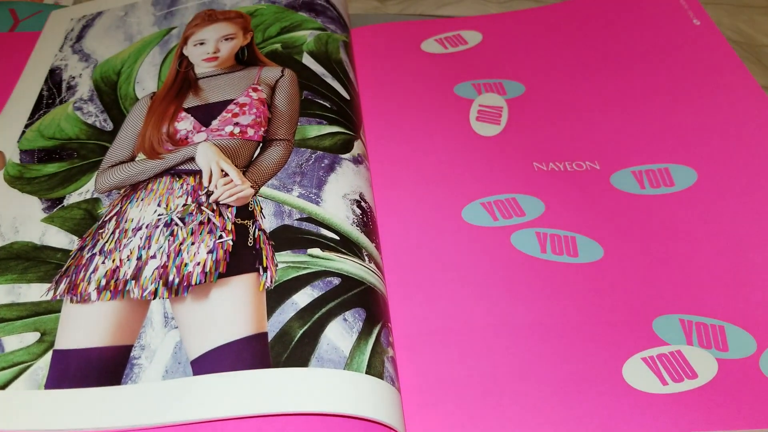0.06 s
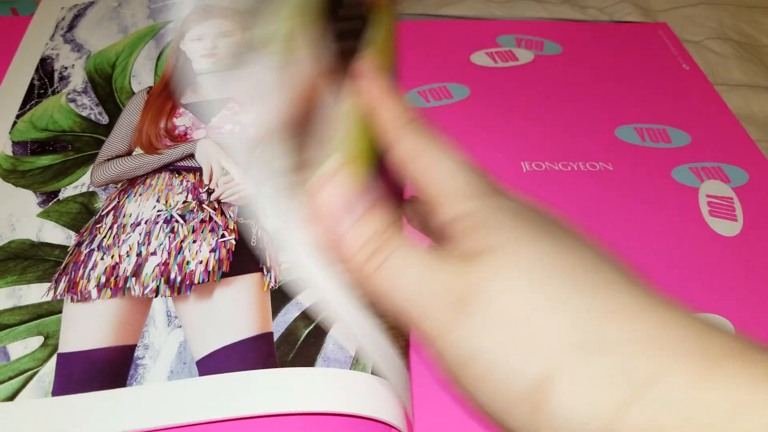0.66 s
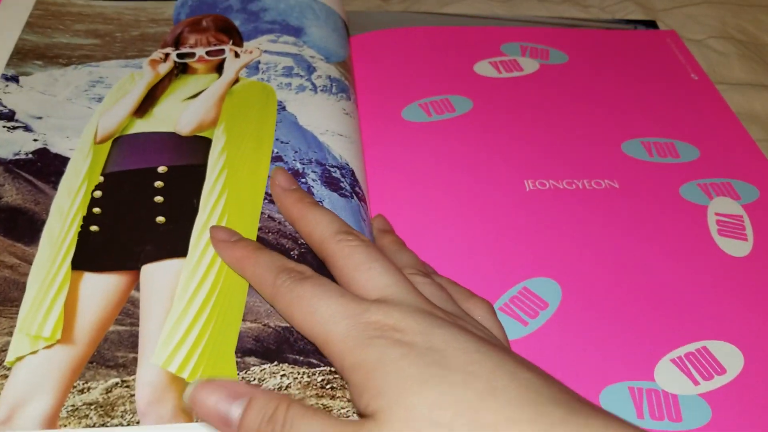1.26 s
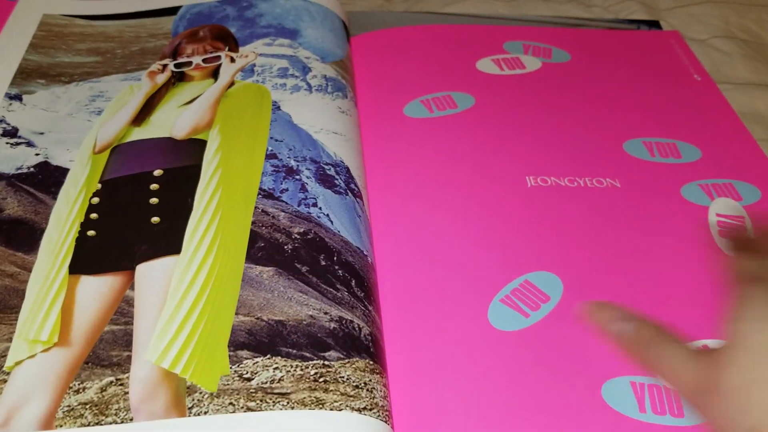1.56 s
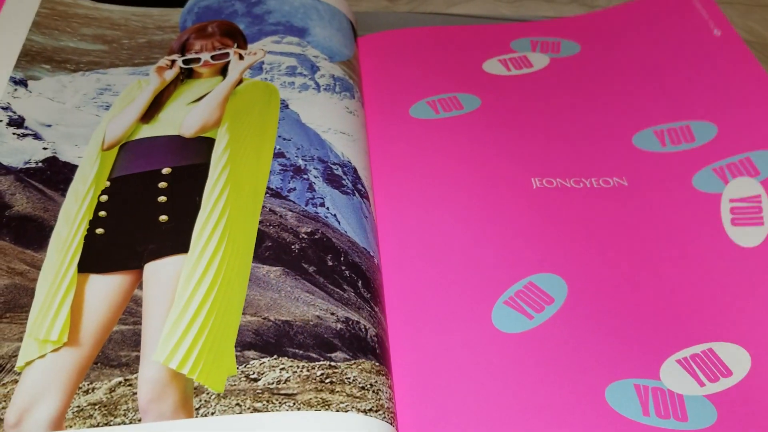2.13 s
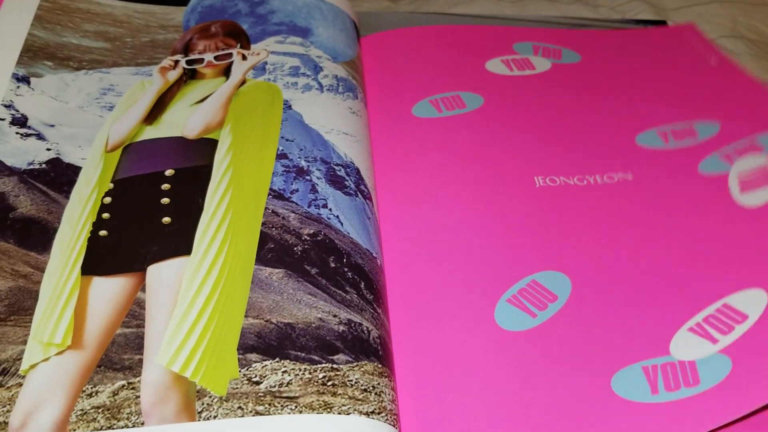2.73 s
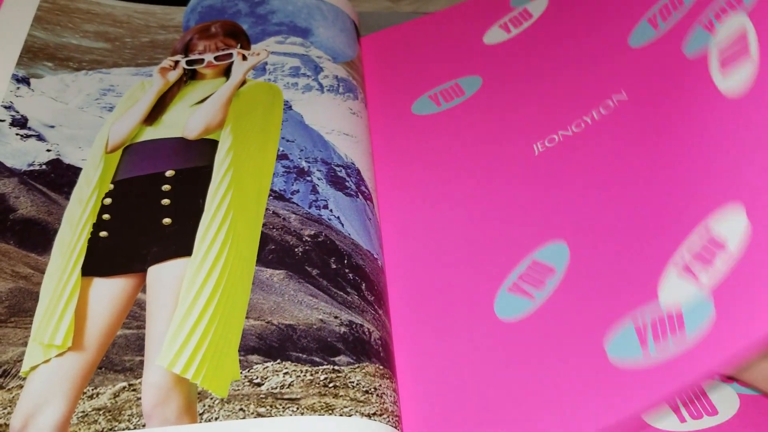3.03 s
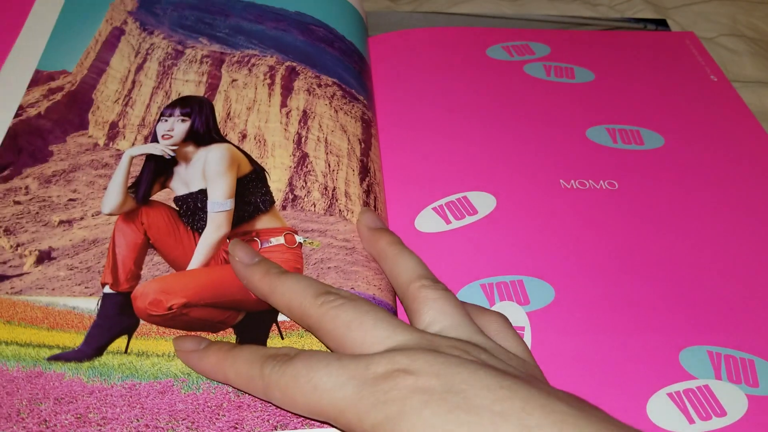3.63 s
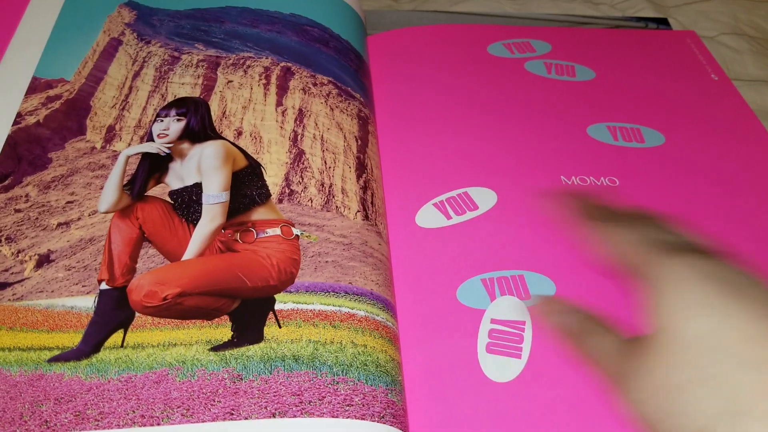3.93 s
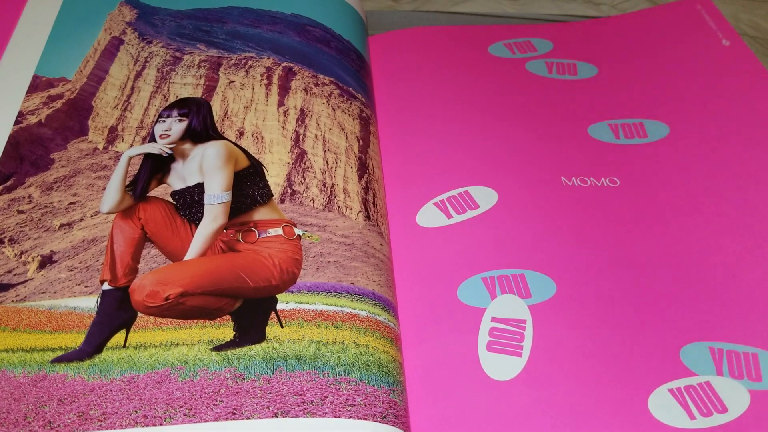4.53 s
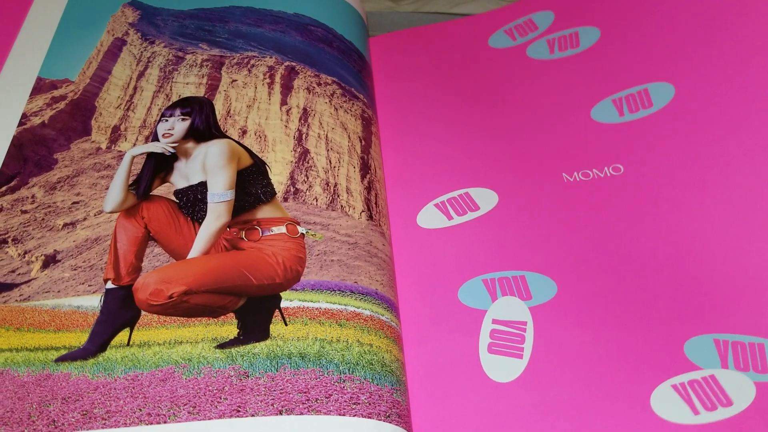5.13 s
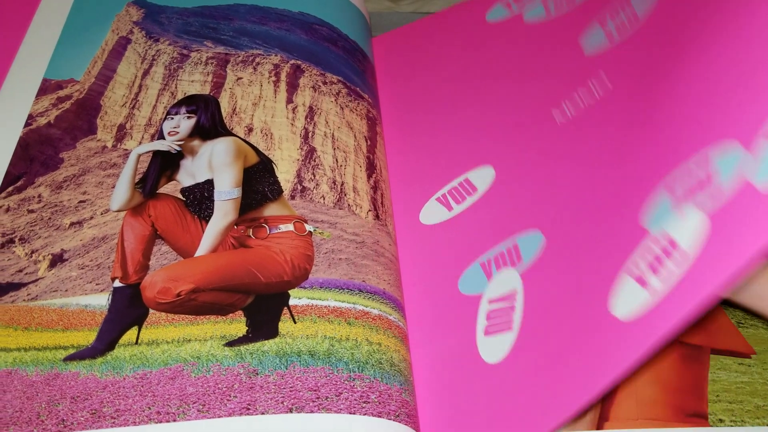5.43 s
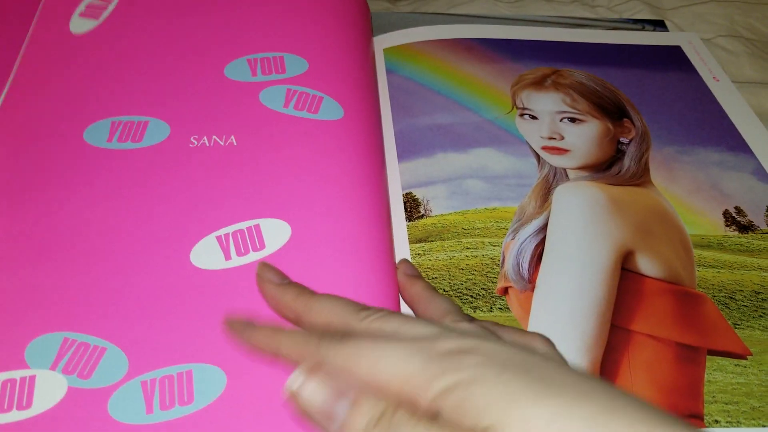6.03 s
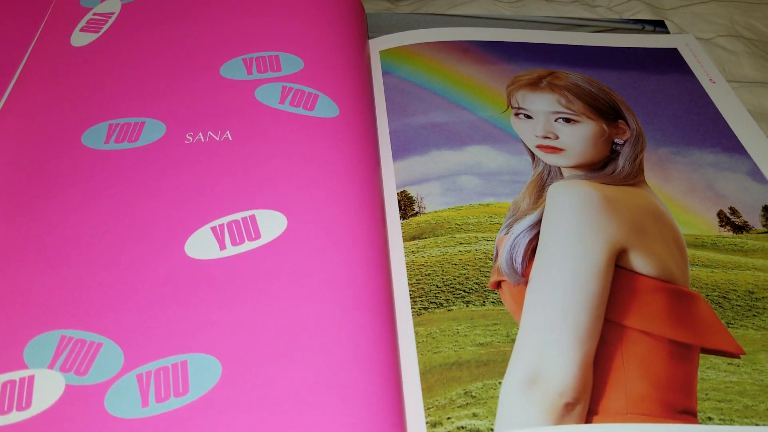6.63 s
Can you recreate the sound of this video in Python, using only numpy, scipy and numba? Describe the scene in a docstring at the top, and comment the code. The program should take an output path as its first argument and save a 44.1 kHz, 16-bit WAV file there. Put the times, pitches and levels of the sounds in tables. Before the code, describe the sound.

Stiff paper crackles and scrapes under fingertips, then a big glossy sheet swishes over and lands with a hollow flap. This happens three times, with light thumps from the book, palm pats and hissing strokes across the page in between. The sound is close and dry, leaning left and moving further left with each turn, over the faint background hiss of a small furnished room.

```python
"""Paper crackles and rubs as fingers pick at a page edge: three large glossy pages of a photo book are
turned by hand, close by, in a small quiet room. Each sheet buckles with a hollow flap, hisses over its
neighbour and sweeps down on the left; the hand pats it flat and strokes away across the paper.
Friction is grainy noise, coloured by the air under the sheet; blows ring the sheet and the book."""
import sys
import numpy as np
from scipy import signal
from scipy.fft import rfft, irfft
from scipy.io import wavfile
from scipy.ndimage import uniform_filter1d, map_coordinates
from numba import njit

SR = 44100
rng = np.random.default_rng(int(sys.argv[2]) if len(sys.argv) > 2 else 0)


def waveform_to_disk(signal):
    """Save audio, clipped to [-1, 1], as 16-bit WAV at the path in sys.argv[1]."""
    frames = np.transpose(np.atleast_2d(signal))
    scaled = np.clip(frames, -1, 1) * 32767
    samples = np.round(scaled).astype(np.int16)
    wavfile.write(sys.argv[1], SR, samples)


N = 299439
T = np.arange(N) / SR

# Spectral shapes. Each row: frequency in Hz, relative density in dB.
ROOM_SPECTRUM = [(25, -14), (100, -3.5), (200, -17), (500, -26.5), (1300, -27.5), (15000, -33.5)]
HISS_SPECTRUM = [(200, -29.5), (1000, -24), (2500, -15), (4500, -4.5), (7000, -4), (10000, 1), (13000, 4.5),
                 (17000, -1)]
RUB_SPECTRUM = [(22, -25), (100, 9.5), (300, 1.5), (550, -16.5), (850, 0.5), (1500, -1.5), (3000, 4.5),
                (4600, -4), (7000, -7), (15000, -24.5)]
CREASE_SPECTRUM = [(22, -16), (120, -0.5), (330, -1), (550, -9.5), (850, -1.5), (1500, -2), (2600, -4.5),
                   (8000, -32.5)]
SNAP_SPECTRUM = [(1000, -67), (2800, -12), (4400, 11.5), (6500, 7), (16000, 2.5)]
# Book on the bedding. Each row: resonance in Hz, width in Hz, gain in dB.
BOOK_MODES = [(112, 30, -2.5), (155.7, 28, 4.5), (238, 54, -0.5)]
# Page stack under a fingertip. Each row: resonance in Hz, width in Hz, gain in dB.
STACK_MODES = [(318, 350, 4.5), (788, 145, 2.5), (1270, 1600, -8.5)]
# Bent sheet. Each row: multiple of the flap pitch, relative width, gain in dB.
SHEET_MODES = [(0.85, 0.6, -8.5), (1.1, 0.46, 2), (1.52, 0.15, -12)]
# Air in the curl of a lifted sheet. Each entry: resonance in Hz before drift.
CURL_MODES_HZ = [1284, 1760, 2032, 2518, 2667, 4330, 5710]

# Event levels below are at the source, before filtering and balance.
# Soft blows on the block of pages. Each row: start in seconds, level in dB.
BOOK_THUMPS = [(0.019, -45.5), (0.116, -48), (0.561, -44), (1.211, -55.5), (1.306, -53.5), (2.966, -46),
               (3.023, -45), (3.173, -42.5), (4.705, -51), (4.752, -51.5), (4.978, -49), (6.653, -54.5)]
# Palm pats the page flat. Each row: start in seconds, tick level in dB, thud level in dB.
PALM_PATS = [(3.4253, -39.5, -48), (3.704, -44.5, -42), (5.7623, -37, -55), (6.006, -45, -45.5)]
# Fingertip drags. Each row: peak time in seconds, level in dB, half-width in seconds.
FINGER_SCUFFS = [(1.036, -59, .01), (1.3, -73, 0.059), (2.223, -55.5, 0.027), (3.725, -59, 0.015),
                 (4.335, -61, 0.013), (4.422, -59.5, 0.01), (4.73, -55, 0.032), (6.09, -63, 0.039)]
# Hand or loose sheet brushes the page. Each row: peak time in seconds, level in dB, rise and fall
# in seconds.
BRUSH_STROKES = [(0.57, -51.5, 0.0065, 0.041), (0.719, -58.5, 0.044, 0.034), (1.43, -58, 0.023, 0.014),
                 (1.557, -48, 0.043, 0.045), (1.86, -64.5, 0.27, 0.042), (2.09, -68, 0.01, 0.04),
                 (3.865, -52, 0.037, 0.036), (3.992, -43, 0.023, 0.033), (4.201, -63.5, 0.11, 0.12),
                 (6.134, -56.5, 0.054, 0.0055), (6.245, -43.5, 0.038, 0.034), (6.48, -60, 0.039, 0.021)]
# Edge or palm sweeps the page. Each row: peak time in seconds, level in dB, pitch at the peak in Hz,
# swell and t60 in seconds.
EDGE_SCRAPES = [(0.324, -42, 2770, 0.048, 0.22), (0.979, -47, 2420, 0.054, 0.13),
                (2.57, -47, 3200, 0.053, 0.13), (2.718, -47, 2070, 0.053, 0.44),
                (2.971, -36.5, 4070, 0.0032, .02), (3.557, -43.5, 2220, 0.045, 0.062),
                (3.981, -55, 4660, 0.033, 0.3), (4.401, -58.5, 7250, 0.009, 0.18),
                (4.814, -34.5, 4000, 0.015, 0.056), (4.853, -37, 2200, 0.034, 0.049),
                (5.06, -43, 1480, 0.061, 0.38), (5.143, -48, 1400, 0.034, 0.055),
                (5.659, -51, 1120, 0.088, 0.6), (5.858, -43, 2130, 0.039, 0.061),
                (6.261, -60, 970, 0.098, 0.27), (5.29, -53.5, 1450, 0.022, 0.68)]
# Fingers tug the sheet or feel along its edge. Each row: start and hold in seconds, level in dB.
FINGER_PULLS = [(0.096, 0.016, -53), (0.206, 0.04, -54), (0.288, 0.17, -74), (1.04, 0.19, -71),
                (2.348, 0.21, -49.5), (3.0, 0.051, -59), (4.465, 0.028, -65), (4.578, 0.21, -67.5),
                (4.814, 0.024, -47.5), (4.913, 0.095, -52.5), (5.062, 0.08, -54.5), (5.275, 0.0099, -51)]
# Edges slip off fingers, creases snap. Each row: start in seconds, body and snap in dB, t60 in seconds.
EDGE_CRACKLES = [(0.001, -44, -47, 0.074), (0.083, -41.5, -41, 0.051), (0.1143, -37, -39.5, 0.035),
                 (0.1735, -40.5, -43.5, 0.033), (0.199, -38, -42, 0.015), (0.383, -45, -55, 0.029),
                 (0.795, -47.5, -50, 0.08), (1.125, -66, -49.5, 0.029), (2.326, -43.5, -36, 0.11),
                 (2.356, -38, -50, 0.073), (2.379, -39.5, -44, 0.043), (2.412, -35, -40.5, 0.074),
                 (2.437, -35, -45, 0.042), (2.467, -34.5, -45.5, 0.062), (2.490, -37.5, -45, 0.12),
                 (2.5279, -40, -47, 0.02), (2.951, -46, -51.5, 0.05), (2.9659, -36.5, -48, 0.047),
                 (3.173, -47, -48, 0.024), (4.42, -55, -54.5, 0.067), (4.702, -55, -53, 0.11),
                 (4.7909, -40.5, -43.5, 0.013), (4.893, -41, -48.5, 0.091), (4.923, -35, -44, 0.082),
                 (4.947, -38, -51, 0.054), (4.971, -38, -49, 0.037), (5.007, -34.5, -43.5, 0.064),
                 (5.031, -35.5, -43.5, 0.043), (5.12, -47.5, -47.5, 0.14), (5.232, -40.5, -47.5, 0.067),
                 (5.277, -45.5, -48, 0.075), (6.655, -58, -58.5, 0.087), (6.7671, -53.5, -51, 0.026)]
# Sheet buckles or lands on its air cushion. Each row: start in seconds, level in dB, pitch in Hz,
# swell and t60 in seconds.
SHEET_FLAPS = [(0.847, -44, 870, 0.004, 0.063), (0.9889, -35.5, 764, 0.00038, 0.032),
               (2.288, -53.5, 1110, 0.004, 0.14), (2.975, -30.5, 1070, 0.0024, 0.021),
               (2.979, -27, 870, 0.0079, 0.03), (2.9945, -49, 1060, 0.00041, 0.021),
               (3.008, -42.5, 1230, 0.0069, 0.055), (3.176, -54, 680, 0.0044, 0.074),
               (3.426, -35, 1310, 0.0078, 0.12), (5.763, -39, 1100, 0.003, 0.095),
               (5.7937, -39, 1240, 0.0018, 0.033)]
# Sheet is carried over. Each row: lift and landing in seconds, lead of the fastest swing on the landing
# in seconds, carry rub, carry hiss and swing hiss in dB.
PAGE_TURNS = [(0.2, 0.979, 0.47, -62.5, -60, -60.5), (2.6, 3.557, 0.24, -67.5, -64.5, -50),
              (5.24, 5.855, 0.22, -69.5, -64.5, -51.5)]
# Hand crosses the spine. Each row: leftward time and return time in seconds.
SPINE_CROSSINGS = [(0.58, 1.45), (3.14, 3.85), (5.55, 6.2)]


def undb(db):
    """Decibels to gain."""
    return 10 ** (np.asarray(db) / 20)


def unit(x):
    """Scale to rms 1."""
    return x / np.sqrt(np.mean(x ** 2))


def colour(x, spectrum):
    """Minimum-phase filter of unit power through (Hz, dB) points."""
    hz, db = np.transpose(spectrum)
    grid_hz = np.maximum(np.fft.rfftfreq(4096, 1 / SR), 1)
    cepstrum = irfft(np.log(undb(np.interp(np.log(grid_hz), np.log(hz), db))))
    half = len(cepstrum) // 2
    causal = cepstrum * np.r_[1, np.full(half - 1, 2), np.zeros(half)]
    response = irfft(np.exp(rfft(causal)))[:half]
    return signal.oaconvolve(x, response / np.linalg.norm(response))[:len(x)]


@njit
def resonate(x, hz, width):
    """State-variable band-pass with a moving centre; width is relative to the centre."""
    y, band_state, low_state = np.empty(len(x)), 0., 0.
    for i in range(len(x)):
        g = np.tan(np.pi * hz[i] / SR)
        band = (band_state + g * (x[i] - low_state)) / (1 + g * (g + width))
        band_state, low_state = 2 * band - band_state, low_state + 2 * g * band
        y[i] = width * band
    return y


def ring(x, hz, width):
    """One fixed resonance."""
    return resonate(x + 1e-18, np.full(len(x), float(hz)), float(width))


def walk(rate_hz):
    """Smooth random wander, spread near 1."""
    return np.interp(T * rate_hz, np.arange(N), rng.standard_normal(N))


def grains(count, rough_db):
    """Dense micro-slips of uneven size."""
    noise = rng.standard_normal(count)
    sizes = np.repeat(rng.standard_normal(count // 16 + 1), 16)[:count]
    return unit(noise * undb(rough_db * sizes))


def fade(t, t60_s):
    """Exponential decay, 60 dB in t60_s."""
    return undb(-60 * t / max(t60_s, .004))


def glide(peak_s, rise_s, fall_s):
    """Speed of a smooth movement."""
    return 1 / np.cosh(np.clip((T - peak_s) / np.where(T < peak_s, rise_s, fall_s), -20, 20))


def hold(start_s, end_s, t60_s, grip_s=0.032):
    """A pull builds up to start_s, holds until end_s, dies away."""
    return np.clip(1 + (T - start_s) / grip_s, 0, 1) * fade(np.maximum(T - end_s, 0), t60_s)


def add(track, start_s, x, db):
    """Mix in an event with its loudest 5 ms at db."""
    start = max(int(start_s * SR), 0)
    top_rms = np.sqrt(uniform_filter1d(x ** 2, size=220).max())
    track[start:start + len(x)] += (x * undb(db) / top_rms)[:N - start]


def room_tone(level_db=-68):
    """Faint room rumble and microphone hiss."""
    common = rng.standard_normal(N)
    air = np.array([colour(common + rng.standard_normal(N), ROOM_SPECTRUM) for _ in range(2)])
    return unit(air) * undb(level_db + walk(5.22))


def reflections(x, t60_s=0.16, delay_s=.004, damp_hz=3990):
    """Dense dying echoes, different at each microphone port."""
    t = T[:SR // 2]
    clouds = rng.standard_normal((2, len(t))) * fade(t, t60_s) * (t > delay_s)
    clouds = signal.sosfilt(signal.butter(1, damp_hz, fs=SR, output="sos"), clouds)
    return np.array([signal.oaconvolve(x, cloud / np.linalg.norm(cloud))[:N] for cloud in clouds])


def port_lag(right_samples=8.87, left_samples=-10.5, cross_s=0.055):
    """Lag of the left port in samples as the hand moves between the right and left page."""
    leftward = sum(np.tanh((T - goes_s) / cross_s) - np.tanh((T - back_s) / cross_s)
                   for goes_s, back_s in SPINE_CROSSINGS) / 2
    return right_samples + (left_samples - right_samples) * leftward


def ports(x):
    """Two ports hear the moving page with a lag."""
    lag = port_lag()
    return np.array([map_coordinates(x, [np.arange(N) - side * lag / 2], order=3) for side in (1, -1)])


def hollow_tone(x, dip_hz=530, peak_hz=770, width=0.57):
    """A fixed dip near 530 Hz and lift near 770 Hz make the flaps sound hollow."""
    return x - 0.55 * ring(x, dip_hz, width) + 0.6 * ring(x, peak_hz, width)


def curl(x, size, depth=0.75, width=0.031, gain_db=-2):
    """The hollow under the sheet rings; its pitches drift with its size."""
    hollow = sum(resonate(x + 1e-18, hz / size, width) for hz in CURL_MODES_HZ)
    return undb(gain_db) * (x + depth * hollow)


def gap_echo(x, strength, size, echo_s=.00043, echo_gain=.33, sweep_octaves=0.37):
    """Hiss bounces in the gap over the page: a comb, pitched higher while a stroke speeds up."""
    growth = np.maximum(np.gradient(np.log(strength)), 0)
    speeding = np.tanh(uniform_filter1d(growth, size=2000) * SR / 30)
    delay_s = echo_s * size * 2 ** (-sweep_octaves * speeding)
    return x + echo_gain * map_coordinates(x, [(T - delay_s) * SR], order=3)


def thumps(contact_s=0.0012, settle_t60_s=.12):
    """A soft push rocks the book, then the pages settle."""
    out, t = np.zeros(N), T[:SR // 4]
    for start_s, db in BOOK_THUMPS:
        settling = rng.standard_normal(len(t)) * fade(t, settle_t60_s)
        force = t / contact_s * np.exp(-t / contact_s) + settling
        body = sum(undb(mode_db) * ring(force, hz, width_hz / hz) for hz, width_hz, mode_db in BOOK_MODES)
        add(out, start_s, body, db)
    return out


def palm_thuds(contact_s=0.0016):
    """The broad palm pushes slowly; only the book's lowest mode answers."""
    out, t = np.zeros(N), T[:SR // 6]
    hz, width_hz, _ = BOOK_MODES[0]
    force = (t / contact_s) ** 2 * np.exp(-(t / contact_s) ** 2)
    for start_s, _, db in PALM_PATS:
        add(out, start_s, ring(force, hz, width_hz / hz), db)
    return out


def palm_ticks(t60_s=0.011):
    """A pat spits air from between the sheets."""
    out, t = np.zeros(N), T[:SR // 20]
    for start_s, db, _ in PALM_PATS:
        add(out, start_s, colour(rng.standard_normal(len(t)) * fade(t, t60_s), HISS_SPECTRUM), db)
    return out


def scuffs(judder_db=2.0):
    """A fingertip drags unevenly and shifts the loose stack: a swell with no knock."""
    out = np.zeros(N)
    for peak_s, db, half_s in FINGER_SCUFFS:
        t = np.arange(-int(2 * half_s * SR), int(3 * half_s * SR)) / SR
        force = rng.standard_normal(len(t)) * np.exp(-(t / half_s) ** 2)
        force *= undb(judder_db * walk(90)[:len(t)])
        body = sum(undb(mode_db) * ring(ring(force, hz, width_hz / hz), hz, 0.95)
                   for hz, width_hz, mode_db in STACK_MODES)
        add(out, peak_s + t[0], body, db)
    return out


def brushing():
    """Strength of the strokes over the paper."""
    return sum(undb(db) * glide(peak_s, rise_s, fall_s) for peak_s, db, rise_s, fall_s in BRUSH_STROKES)


def scrapes(width=0.45, skirt_width=6.8):
    """Friction noise rings the air wedge under the sheet; the pitch sinks through the stroke."""
    out = np.zeros(N)
    for peak_s, db, hz, swell_s, t60_s in EDGE_SCRAPES:
        t = np.arange(-int(2 * swell_s * SR), int(t60_s * SR)) / SR
        speed = np.where(t < 0, np.exp(-2 * (t / swell_s) ** 2), fade(np.abs(t), t60_s))
        pitch_hz = hz * np.exp(-.18 * np.tanh(10 * t))
        hollow = resonate(grains(len(t), rough_db=1.5), pitch_hz, width)
        add(out, peak_s + t[0], resonate(hollow, pitch_hz, skirt_width) * speed, db)
    return out


def crinkles(bending, count=800, spread_db=3.0, decay_cycles=2.6, low_hz=1500, high_hz=5200):
    """Small dents pop in the bent sheet, each a dry ring; harder bending pops louder."""
    out, t = np.zeros(N), T[:SR // 60]
    for when, pitch, softness in rng.random((count, 3)):
        i, hz = int(when * N), low_hz * (high_hz / low_hz) ** pitch
        db = 20 * np.log10(bending[i]) - 1 - spread_db * np.log(softness + 0.05)
        add(out, T[i], np.sin(2 * np.pi * hz * t) * np.exp(-hz * t / decay_cycles), db)
    return out


def rub(strength, judder_db=3.5):
    """Stick and slip shakes the whole sheet."""
    return colour(grains(N, rough_db=0), RUB_SPECTRUM) * strength * undb(judder_db * walk(130))


def slide(strength, size, flutter_db=1.4, judder_db=2, patchy_db=4.0, wander_octaves=0.26):
    """Glossy sheets hiss; wandering resonances of the air between them swell and fade."""
    hiss = colour(grains(N, rough_db=1.5), HISS_SPECTRUM)
    for hz in np.geomspace(4500, 13500, 4):
        centre_hz = np.minimum(hz * 2 ** (wander_octaves * walk(11)), SR / 2.5)
        hiss = hiss + (undb(patchy_db * walk(18)) - 1) * resonate(hiss, centre_hz, 0.2)
    uneven_db = flutter_db * walk(28) + judder_db * walk(220)
    return unit(gap_echo(hiss, strength, size)) * strength * undb(uneven_db)


def crackles(bend_octaves, tick_s=0.05, flex_gain=1.24, flex_hz=1900, flex_width=0.031):
    """Showers of slips; short ones open with a tick. Each bend stiffens the sheet to new pitches."""
    out, t = np.zeros(N), T[:SR // 5]
    for (start_s, body_db, snap_db, t60_s), octaves in zip(EDGE_CRACKLES, bend_octaves):
        build = 1 - np.exp(-t / (.035 * t60_s))
        shower = grains(len(t), rough_db=4.5) * fade(t, t60_s) * build
        shower[0] += 10 * np.exp(-t60_s / tick_s)
        flex = sum(ring(shower, flex_hz * 2 ** octave, flex_width) for octave in octaves)
        add(out, start_s, colour(shower + flex_gain * flex, CREASE_SPECTRUM), body_db)
        add(out, start_s, colour(shower, SNAP_SPECTRUM), snap_db)
    return out


def flaps(pop=9, book_hz=280):
    """The sheet flutters up to a pop, rings in broad modes and shakes the book."""
    out, t = np.zeros(N), T[:SR // 6]
    loudest_db = max(row[1] for row in SHEET_FLAPS)
    for start_s, db, hz, swell_s, t60_s in SHEET_FLAPS:
        envelope = np.minimum(t / swell_s, 1) * fade(np.maximum(t - swell_s, 0), t60_s)
        force = rng.standard_normal(len(t)) * envelope
        force[int(swell_s * SR)] += pop
        sheet = sum(undb(mode_db) * ring(ring(force, hz * ratio, width), hz * ratio, 0.68)
                    for ratio, width, mode_db in SHEET_MODES)
        book = ring(ring(force, book_hz, 1), book_hz, 0.69)
        book_db = -2 + 0.14 * (db - loudest_db)  # light flaps shake it less
        add(out, start_s, sheet + undb(book_db) * book, db)
    return out


def turning(peel_hiss_db=-10.5, swing_rub_db=-12.5, swing_s=0.074, flick_db=-48):
    """Strengths of rub and hiss: pulls mostly rub, the carried sheet murmurs, swing and flick hiss."""
    pull = sum(undb(db) * hold(start_s, start_s + held_s, t60_s=0.2)
               for start_s, held_s, db in FINGER_PULLS) + 1e-6
    rubbing, hissing = pull, undb(peel_hiss_db) * pull
    for lift_s, land_s, lead_s, rub_db, hiss_db, swing_db in PAGE_TURNS:
        carry = hold(lift_s, land_s, t60_s=0.27)
        swing = undb(swing_db) * glide(land_s - lead_s, swing_s, swing_s)
        flick = undb(flick_db) * glide(land_s, rise_s=0.016, fall_s=0.0059)  # edge skims the page below
        rubbing = rubbing + undb(rub_db) * carry + undb(swing_rub_db) * swing
        hissing = hissing + undb(hiss_db) * carry + swing + flick
    return rubbing, hissing


def paper_patch(rubbing, hissing, size, bend_octaves):
    """One patch of paper slides, is patted and bends."""
    hiss = slide(hissing, size) + palm_ticks()
    return hiss + curl(rub(rubbing) + scrapes() + crackles(bend_octaves), size)


def pages(split_hz=2900, skin_rub_db=-27, drift_octaves=0.087, hand_right_db=1.5):
    """A wide sheet: the ports share its blows and lows; each hears the treble of its own patch."""
    rubbing, hissing = turning()
    hand = brushing()
    rubbing = rubbing + undb(skin_rub_db) * hand
    size = 2 ** (drift_octaves * walk(10))  # relative size of the hollow under the sheet
    bend_octaves = rng.uniform(-1.007, 1, size=(len(EDGE_CRACKLES), 2))
    low, high = (signal.butter(1, split_hz, kind, fs=SR, output="sos") for kind in ("low", "high"))
    blows = hollow_tone(flaps()) + thumps() + palm_thuds() + scuffs() + curl(crinkles(rubbing), size)
    lows = signal.sosfilt(low, paper_patch(rubbing, hissing + hand, size, bend_octaves))
    patches = [paper_patch(rubbing, hissing + hand * undb(side * hand_right_db / 2), size, bend_octaves)
               for side in (-1, 1)]
    return ports(lows + blows) + signal.sosfilt(high, patches)


def scene(left_db=6.0, shade_db_per_sample=0.1467, room_db=-13):
    """The pages, nearer the left port, in a small furnished room."""
    paper = pages()
    room = undb(room_db) * reflections(paper.mean(axis=0))
    balance_db = left_db - shade_db_per_sample * port_lag()  # further left, the right port is shaded more
    return (paper + room) * undb(np.array([balance_db, -balance_db]) / 2) + room_tone()


def record(dry):
    """Steep low-pass at 15950 Hz."""
    return signal.sosfilt(signal.ellip(10, .2, 70, 15950, fs=SR, output="sos"), dry)


dry = scene()
out = record(dry)
waveform_to_disk(out)
```